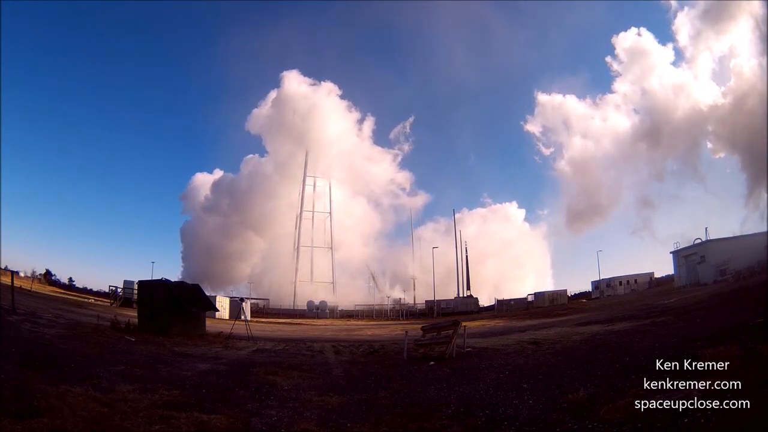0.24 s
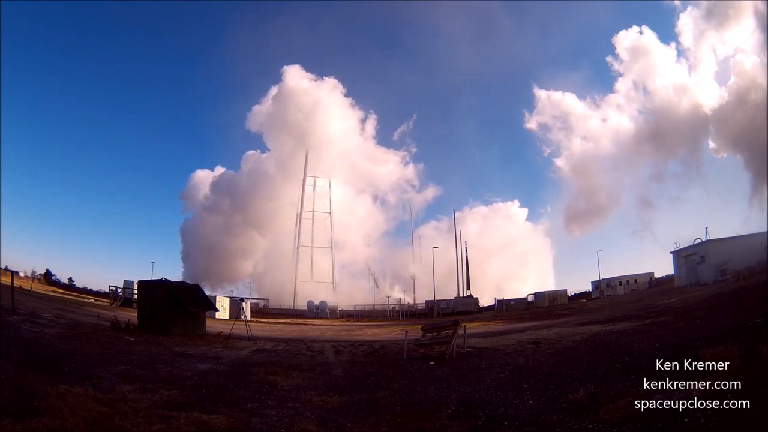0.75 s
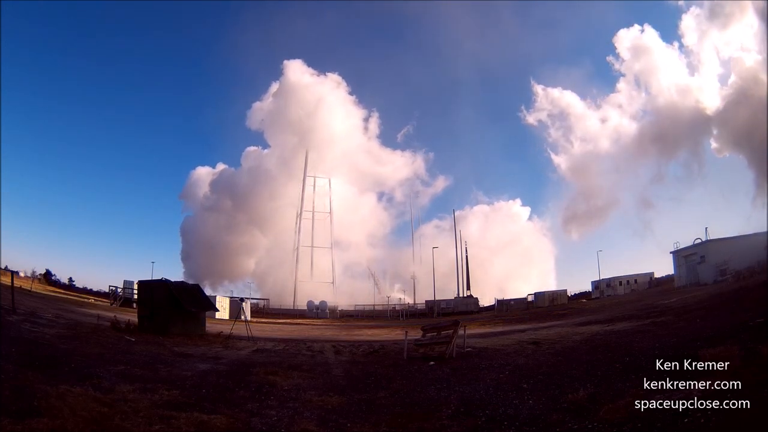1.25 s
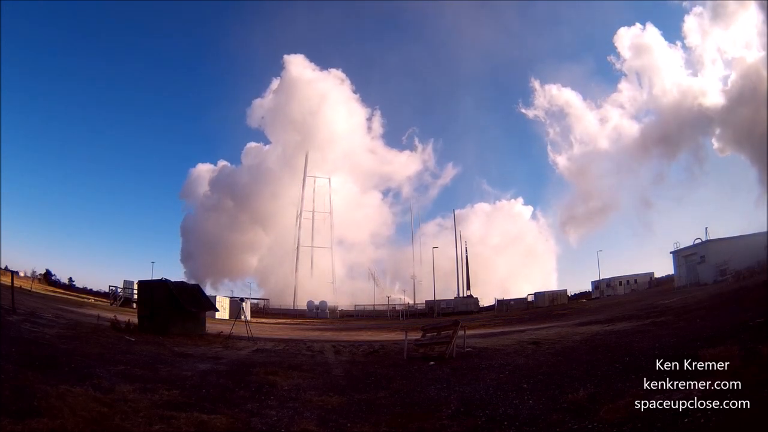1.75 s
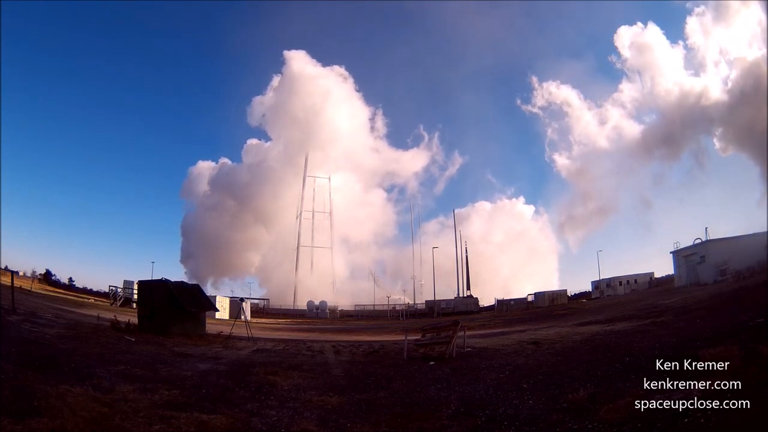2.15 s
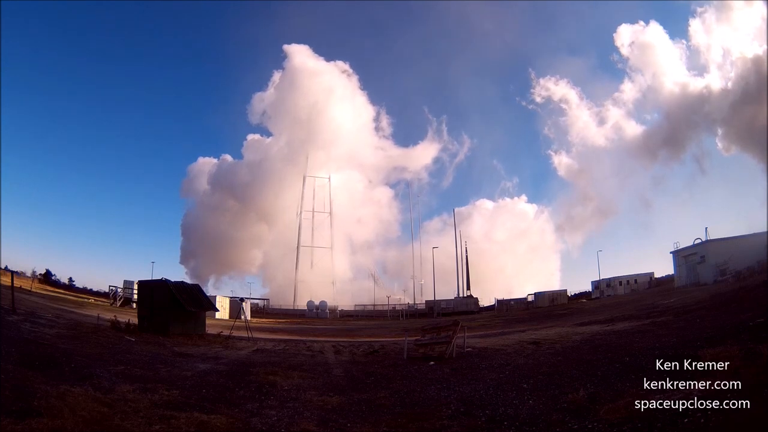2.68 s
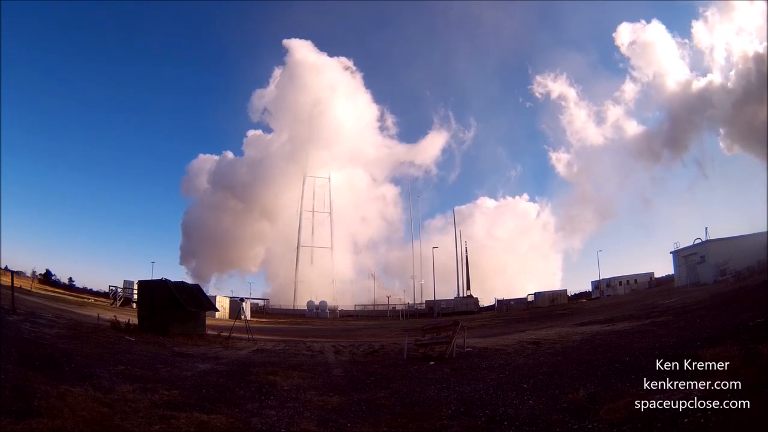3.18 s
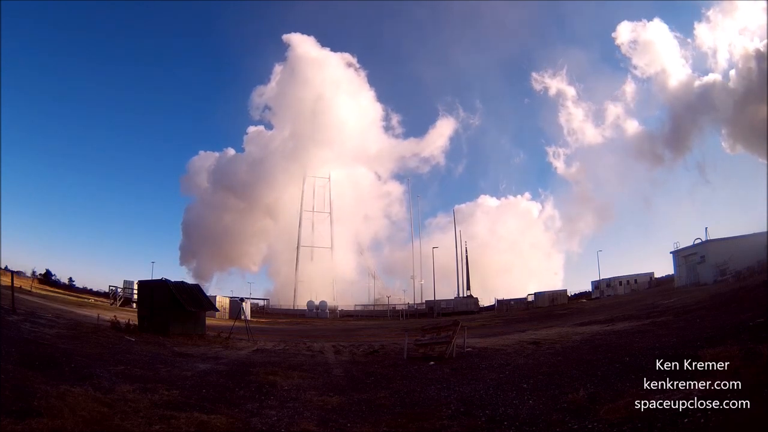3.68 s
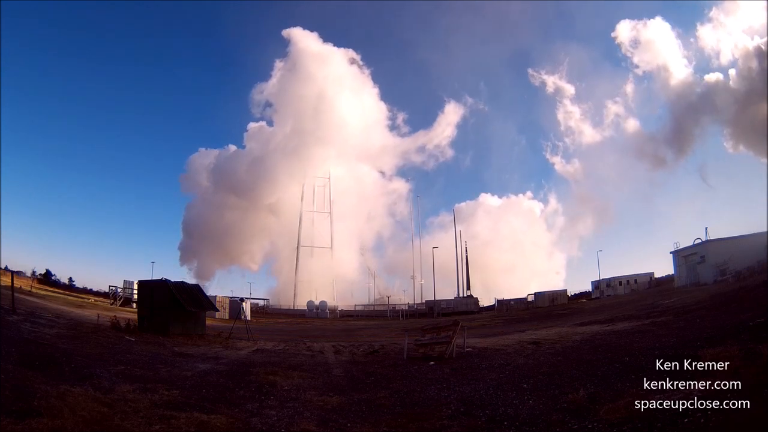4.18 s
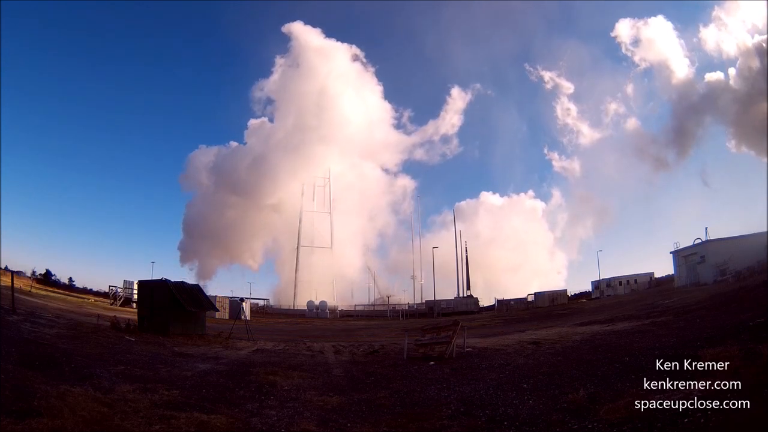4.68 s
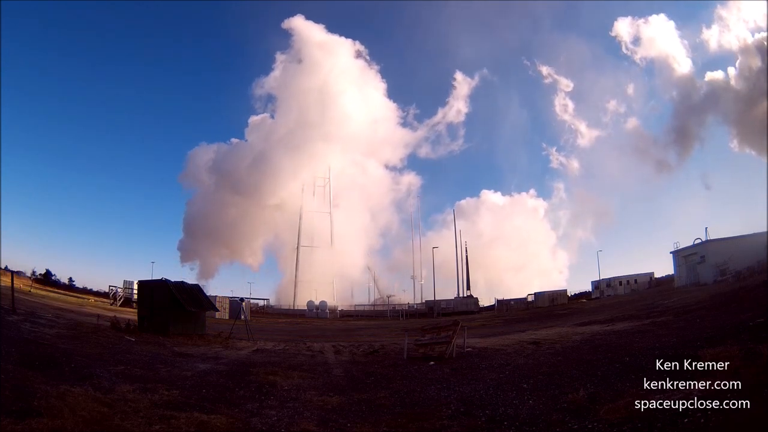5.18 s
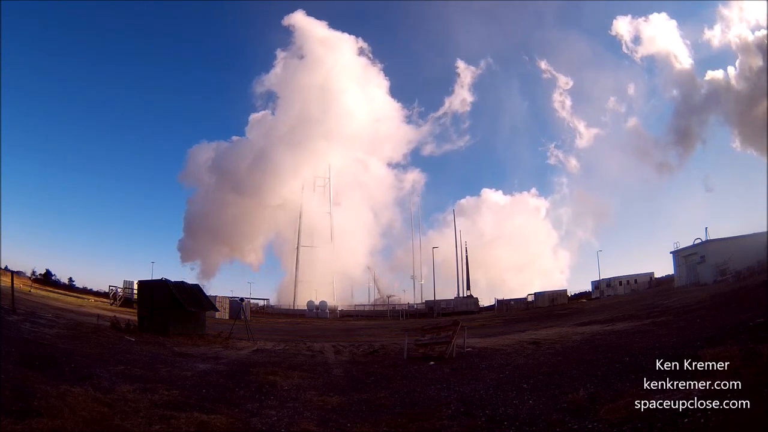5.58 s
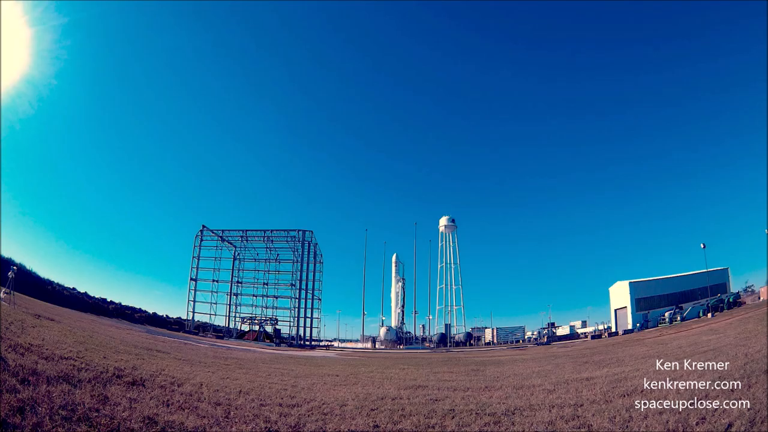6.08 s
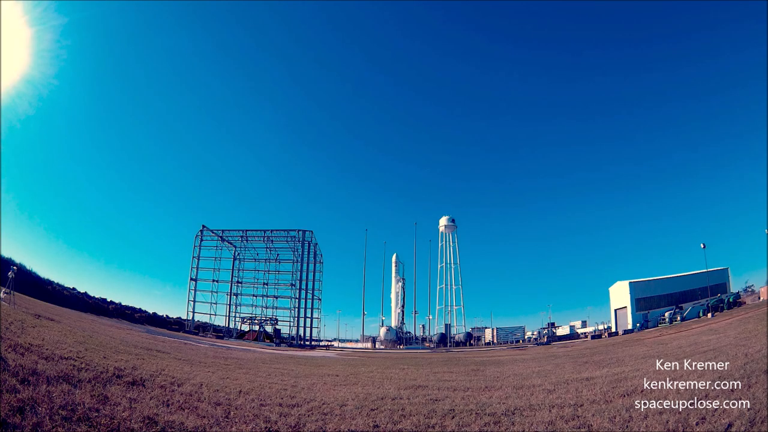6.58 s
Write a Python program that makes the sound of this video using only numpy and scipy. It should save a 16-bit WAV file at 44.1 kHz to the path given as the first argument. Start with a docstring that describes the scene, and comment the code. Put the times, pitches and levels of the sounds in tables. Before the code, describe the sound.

A rocket engine roars harshly and steadily close by, thudding low, then cuts off abruptly to a very quiet windy field with faint bird chirps.

```python
"""Rocket exhaust, then a quiet field

Rocket exhaust roars near a launch pad: turbulent noise, split into bands with their own level curves and coloured
by the resonances and notches of a small microphone housing. Windowed sines add low thuds and short mid-pitched
surges; the bass slowly fades. An edit cuts to a field through a similar housing: noise for soft wind, gliding
sines for a thin bird call. A faint buzz of ringing ticks, probably the recorder's own electronics, comes and goes."""
import sys
import numpy as np
from scipy import signal
from scipy.fft import rfft, irfft, next_fast_len
from scipy.io import wavfile
from scipy.ndimage import uniform_filter1d, map_coordinates

SR = 44100
rng = np.random.default_rng(int(sys.argv[2]) if len(sys.argv) > 2 else 0)


def waveform_to_disk(signal):
    """Save audio, clipped to [-1, 1], as 16-bit WAV at the path in sys.argv[1]."""
    frames = np.transpose(np.atleast_2d(signal))
    scaled = np.clip(frames, -1, 1) * 32767
    samples = np.round(scaled).astype(np.int16)
    wavfile.write(sys.argv[1], SR, samples)


N = 301541


def amp(db):
    """Decibel law: 20 dB is a factor of ten in amplitude."""
    return 10 ** (np.asarray(db) / 20)


def unit(x):
    """Normalization to an rms of 1."""
    return x / np.sqrt(np.mean(x ** 2) + 1e-20)


def curve(rows):
    """Linear interpolation of (t/s, value) rows to one value per sample."""
    s, values = np.transpose(rows)
    return np.interp(np.arange(N) / SR, s, values)


def bumps(rows):
    """Superposition of Gaussian bells from rows of (t/s, height, half width at 1/e in s)."""
    t = np.arange(N) / SR
    return sum(height * np.exp(-((t - s) / width) ** 2) for s, height, width in rows)


def wobble(rate):
    """Band-limited random modulation: a smooth curve through random knots, rate knots a second."""
    knots = rng.standard_normal(int(N * rate / SR) + 4)
    return map_coordinates(knots, [np.arange(N) * rate / SR])


def filtered(x, response):
    """Linear filtering: the spectrum of x times a complex response of frequency."""
    m = next_fast_len(N + SR // 2)
    spectrum = rfft(x, m) * response(np.fft.rfftfreq(m, 1 / SR))
    return irfft(spectrum, m)[..., :N]


def housed(x, tilt, housing):
    """Cavity coloration: a broad tilt, then a pole-zero pair per resonance (dB > 0) or notch (dB < 0)."""
    def response(f):
        hz, db = np.transpose(tilt)
        gain = amp(np.interp(np.log(f + 1), np.log(hz + 1), db)) + 0j
        for c, w, peak_db in housing:
            g = amp(peak_db / 2)
            zero = c * c - f * f + 1j * f * w * g
            pole = c * c - f * f + 1j * f * w / g
            gain = gain * zero / pole
        return gain
    return filtered(x, response)


def bands(x, edges_hz):
    """Crossover filtering: x split by steep slopes into parts of rms 1, low to high."""
    lows = [filtered(x, lambda f: 1 / (1 + (f / edge) ** 12)) for edge in edges_hz]
    return [unit(high - low) for low, high in zip([0] + lows, lows + [x])]


def steady(x, span_s):
    """Envelope flattening: division by the running rms evens out slow swells."""
    span = int(span_s * SR)
    power = uniform_filter1d(uniform_filter1d(x ** 2, span), span)
    return x / np.sqrt(abs(power) + 1e-9)


def breathy(hz, width_hz):
    """Narrow-band noise of rms 1: a bell-shaped filter, at half amplitude width_hz either side of hz."""
    return unit(filtered(rng.standard_normal(N), lambda f: 1 / (1 + ((f - hz) / width_hz) ** 2)))


def turbulence(patchy_db):
    """Intermittency: white noise with drifting time-frequency patches of gain, as eddies come and go."""
    z = signal.stft(rng.standard_normal(N), nperseg=512)[2]
    patches = uniform_filter1d(uniform_filter1d(rng.standard_normal(z.shape), 8, 0), 10, 1)
    return signal.istft(z * amp(patchy_db * unit(patches)), nperseg=512)[1][:N]


def buzz(bursts, colour):
    """Impulse response of treble resonances: regular ticks, usually after a weaker forerunner, ring briefly."""
    tick_hz = 164.4
    swell_db, swell_s = -2, .03  # a burst starts this soft and fills in over this time
    # Accent pattern of the ticks, which come in threes: level/dB
    tick_steps = [0, -10, -2]
    ticks = np.zeros(N)
    for s, length, db in bursts:
        k = np.arange(int(length * tick_hz) + 1)
        size_db, lead_db, lead_s = rng.standard_normal((len(k), 3)).T
        at = np.round((s + k / tick_hz) * SR).astype(int)
        onset_db = swell_db * np.exp(-k / tick_hz / swell_s)
        size = amp(db + np.take(tick_steps, k % 3) + 1.2 * size_db + onset_db)
        lead = np.round((.0016 + .0002 * lead_s) * SR).astype(int)
        ticks[at] = size
        ticks[at - lead] = size * amp(-6 + 3 * lead_db)

    def ring(f):
        return sum(amp(db) * (1j * f * w / (c * c - f * f + 1j * f * w)) ** 3 for c, w, db in colour)

    one_tick = filtered(signal.unit_impulse(N), ring)
    return filtered(ticks, ring) / abs(one_tick).max()


def field():
    """Flow noise: wind thumps on the housing over a distant rush, a faint hum and uneven microphone hiss."""
    wind_db, rush_db, gust_s = -49, -56.5, 0.021  # between gusts; distant rush; half width of a gust
    # Spectral tilt of the field noise: f/Hz, relative level/dB
    field_tilt = [(8, -14), (20, -10), (34, -2.5), (80, -7), (150, -2), (600, -33.5), (2000, -46.5),
                  (5500, -46), (8500, -42), (10600, -42), (12000, -44), (15000, -45), (15700, -39.5)]
    # Resonances and notches of the field housing: f/Hz, width/Hz, level/dB
    field_housing = [(118, 115, 1.5), (184, 45, -13), (243, 30, 12), (316, 76, -10), (420, 72, 15),
                     (1000, 300, 12), (1117, 38, 14), (1470, 370, 13.5), (1680, 140, 24), (1970, 80, 11),
                     (2260, 149, 12), (2680, 470, 18), (3200, 110, 10), (3797, 636, 6), (4878, 640, 8)]
    # Gusts and sudden lulls: t/s, level over the wind between gusts/dB
    gusts = [(5.985, 7), (6.045, 4), (6.216, 10), (6.258, -2), (6.325, 3), (6.41, 4), (6.53, 3), (6.63, 4),
             (6.678, -2), (6.71, 6.5), (6.83, 5)]
    thump_db = wind_db + bumps([(s, db, gust_s) for s, db in gusts])
    thump, rush, hiss = bands(housed(turbulence(patchy_db=1.5), field_tilt, field_housing), [200, 3000])
    hum = amp(-62.5) * steady(breathy(hz=242, width_hz=1.5), span_s=0.17)
    hum += amp(-71) * steady(breathy(hz=415, width_hz=3), span_s=0.13)
    hum += amp(-83) * breathy(hz=670, width_hz=3)
    wind = amp(thump_db) * steady(thump, span_s=0.11)
    hiss_db = -65.5 + 0.7 * wobble(12)
    return wind + amp(rush_db) * rush + amp(hiss_db) * hiss + hum


def bird():
    """Frequency modulation: unsteady gliding sines, blurred by scattered echoes off ground and sheds."""
    # Whistled notes: t/s, length/s, start f/Hz, end f/Hz, mid-note sag/Hz (negative rises), rms level at crest/dB
    notes = [(5.987, .15, 7770, 7900, 0, -73), (6.445, .115, 7560, 7750, 200, -74),
             (6.566, .036, 7600, 7300, 600, -67), (6.598, .034, 7100, 7100, 1000, -73),
             (6.62, .018, 7140, 7140, 0, -75), (6.653, .022, 6940, 7040, 250, -70),
             (6.65, .022, 6900, 7000, -300, -73), (6.408, .012, 10500, 10900, 0, -69),
             (6.47, .014, 10300, 10100, 0, -75), (6.606, .012, 9800, 10100, 0, -77),
             (6.672, .014, 10300, 11000, 0, -78), (6.708, .014, 10300, 10800, 0, -76),
             (6.738, .012, 10600, 10000, 0, -76), (6.757, .03, 10550, 10600, 0, -79),
             (6.81, .012, 10500, 10700, 0, -78)]
    note_swell = .6  # power of the sine arch that shapes a note
    t, song = np.arange(N) / SR, np.zeros(N)
    for s, length, start_hz, end_hz, sag_hz, db in notes:
        u = np.clip((t - s) / length, 0, 1)
        arch = abs(np.sin(np.pi * u))
        hz = start_hz + (end_hz - start_hz) * u - sag_hz * arch
        level = np.sqrt(2) * amp(db + 1.5 * wobble(120))
        song += arch ** note_swell * level * np.sin(2 * np.pi * np.cumsum(hz) / SR)
    # echoes fall by 60 dB in 0.12 s
    echoes = rng.standard_normal(SR // 5) * amp(-60 * t[:SR // 5] / .12)
    return song + amp(-14) * signal.fftconvolve(song, echoes / np.linalg.norm(echoes))[:N]


def pulses(rows):
    """Wave packets: each pulse is a sine of random phase under a Gaussian envelope a few cycles long."""
    cycles_at_200_hz, cycles_grow = 1.19, 0.3  # half width; power by which higher pulses hold more cycles
    out = np.zeros(N + SR)
    t = np.arange(-SR // 8, SR // 8) / SR
    for (s, db, hz), turn in zip(rows, rng.random(len(rows))):
        width = cycles_at_200_hz * (hz / 200) ** cycles_grow / hz
        packet = np.exp(-(t / width) ** 2) * np.sin(2 * np.pi * (hz * t + turn))
        out[round(s * SR):][:len(t)] += amp(db) * packet
    return out[len(t) // 2:][:N]


def jet_levels():
    """Band energy envelopes: level in dB of each band, low to high; the lowest fade as the rocket climbs."""
    # Deepest rumble: t/s, level/dB
    rumble = [(0, -30), (.5, -26), (1.2, -28), (2.0, -30), (2.8, -30), (3.1, -28.5), (3.7, -26.5),
              (4.3, -30.5), (4.7, -30.5), (5.3, -30.5), (5.95, -32.5)]
    # Thud band: t/s, level/dB
    thud = [(0, -31), (.7, -29.5), (1.3, -31), (2.0, -30.5), (2.6, -34), (3.5, -36.5), (4.5, -35),
            (5.3, -35.5), (5.95, -37)]
    # Body near 270 Hz: t/s, level/dB
    bass = [(0, -31.5), (1.2, -32), (1.8, -32), (2.1, -33.5), (2.6, -28.5), (3.3, -30), (4.3, -30.5),
            (5.0, -32.5), (5.95, -33)]
    # Hollow band near 470 Hz: t/s, level/dB
    hollow = [(0, -38.5), (.5, -36), (1.4, -31.5), (1.8, -38.5), (2.6, -35), (3.4, -36.5), (4.3, -37.5),
              (5.2, -37.5), (5.95, -35.5)]
    # Growl band: t/s, level/dB
    growl = [(0, -30.5), (.4, -29.5), (.9, -33), (1.3, -32.5), (1.6, -29), (2.15, -30), (2.5, -35.5),
             (3.0, -32), (3.7, -29.5), (4.1, -32.5), (5.95, -31)]
    # Roar band: t/s, level/dB
    roar_level = [(0, -26), (.7, -26), (1.15, -27.5), (1.6, -25.5), (2.1, -24), (2.5, -25), (4.7, -25.5),
                  (5.95, -28.5)]
    # Brief flares of the roar band: t/s, rise/dB, half width/s
    flares = [(.75, 4, 0.058), (1.635, 10, 0.0082), (2.0, 2.5, 0.03), (2.11, 3.5, 0.055), (4.07, 2, 0.025),
              (4.43, 5, 0.013), (4.61, 0.5, 0.022), (4.77, 3.5, 0.022)]
    # Hiss band: t/s, level/dB
    jet_hiss = [(0, -33), (.3, -32), (1.2, -33.5), (2.2, -32), (2.7, -32.5), (3.3, -30.5), (4.6, -32),
                (4.75, -32), (5.95, -33.5)]
    # Treble: t/s, level/dB
    fizz = [(0, -41.5), (1.2, -42), (2.55, -42), (2.9, -38.5), (4.0, -39), (4.3, -40), (5.95, -40)]
    return [curve(rumble), curve(thud), curve(bass), curve(hollow), curve(growl),
            curve(roar_level) + bumps(flares), curve(jet_hiss), curve(fizz)]


def exhaust():
    """Turbulent jet noise: most bands swell on their own, a shared flutter moves the upper ones."""
    # Crossovers between the bands: f/Hz
    split_hz = [100, 215, 345, 600, 1240, 2200, 5500]
    # Lowest part of the jet's spectral tilt: f/Hz, relative level/dB
    sub_tilt = [(5, -16), (11, -3), (16, -2.5), (26, 1.5)]
    # Low and middle part of the tilt: f/Hz, relative level/dB
    jet_tilt = [(40, 5.5), (60, 5.5), (200, -1.5)]
    # Upper part of the tilt: f/Hz, relative level/dB
    high_tilt = [(1000, -23), (3000, -29), (7500, -38.6), (9000, -41.4), (11600, -46.6), (11900, -54.4),
                 (15000, -59), (15700, -67)]
    # Low resonances and notches of the pad housing: f/Hz, width/Hz, level/dB
    pad_housing = [(104, 136, -13.5), (278, 35, 5.5), (371, 47, -7.5), (472, 68, 9), (599, 210, -23),
                   (864, 150, 3)]
    # Upper resonances and notches of the pad housing: f/Hz, width/Hz, level/dB
    high_housing = [(1127, 238, 12.6), (1241, 109, -13.5), (1680, 1482, 30.0), (1797, 134, 5.0),
                    (1891, 146, -14.4), (2035, 92, 3.4), (2222, 147, -16.7), (2900, 486, 6.6),
                    (3520, 156, 3.5), (3740, 192, -8.7), (3975, 178, -14.2), (4099, 116, -11.9),
                    (4823, 1010, 25.0), (4940, 213, -21.3), (5109, 190, 4.0), (5505, 89, -11.8),
                    (5873, 170, 2.8), (6160, 76, -2.1), (7266, 163, 4.8), (7374, 2181, 11.3),
                    (8275, 44, -2.6), (8693, 49, -3.6), (8969, 191, -6.8), (9350, 112, -2.6),
                    (9812, 199, 5.6), (10378, 180, -5.4), (10644, 56, -2.8)]
    # Breathy tone that rises late in the roar: t/s, level/dB
    hoot = [(4.3, -62), (4.9, -46), (5.3, -44), (5.95, -36)]
    jet = turbulence(patchy_db=1.0)
    coloured = housed(jet, sub_tilt + jet_tilt + high_tilt, pad_housing + high_housing)
    parts = bands(coloured, split_hz)
    flutter = 0.45 * wobble(45)
    swells_db = [0.33 * wobble(14),
                 1.3 * wobble(12),
                 0.5 * wobble(15) + 0.29 * flutter,
                 0.33 * wobble(11) + 0.3 * flutter,
                 0.53 * flutter + 0.14 * wobble(11),
                 0.34 * flutter,
                 1.1 * flutter + 0.4 * wobble(15),
                 1.1 * flutter + 0.4 * wobble(10)]
    roar = sum(amp(db + swell) * steady(part, span_s=0.19)
               for db, swell, part in zip(jet_levels(), swells_db, parts))
    return roar + amp(curve(hoot)) * breathy(hz=889.4, width_hz=10.4)


def scene():
    """Superposition: pad sources until the cut, field sources after it; one microphone feeds both channels."""
    cut_s = 5.9625
    buzz_start_s, buzz_every_s, buzz_s = .328, 1.0, .25
    buzz_db, buzz_grows_db = -63, .6  # nominal tick peak of the first burst at the pad; rise per burst
    # Low pressure pulses in the exhaust: t/s, envelope peak level/dB, f/Hz
    thuds = [(0.011, -19, 40), (0.018, -15.5, 238), (0.104, -20, 48), (0.146, -17, 209), (0.254, -13, 233),
             (0.287, -17.5, 41), (0.288, -11, 203), (0.407, -13.5, 246), (0.408, -29, 32),
             (0.518, -17, 234), (0.65, -20, 230), (0.7, -22, 25), (0.73, -19, 180), (0.821, -15.5, 205),
             (0.866, -18, 250), (0.922, -18, 232), (0.977, -23, 34), (0.98, -13, 233), (1.017, -12.5, 230),
             (1.07, -31, 190), (1.12, -15.5, 197), (1.161, -18, 40), (1.161, -22, 224), (1.227, -16.5, 210),
             (1.18, -21, 40), (1.284, -14, 250), (1.308, -15, 200), (1.355, -27, 226), (1.433, -16, 231),
             (1.519, -16, 53), (1.564, -15, 201), (1.644, -14, 223), (1.701, -19, 37), (1.729, -14, 220),
             (1.78, -25, 231), (1.82, -18.5, 234), (1.845, -13, 220), (1.938, -23.2, 31), (2.143, -21, 39),
             (2.158, -20, 256), (2.295, -29, 38), (2.347, -18, 237), (2.397, -13.5, 245), (2.576, -30, 31),
             (2.712, -30, 36), (2.849, -18, 263), (3.031, -20, 26), (3.181, -17, 253), (3.183, -20, 34),
             (3.769, -26, 46), (3.769, -26, 243), (4.284, -16, 43), (4.398, -20, 46), (4.756, -29, 38),
             (4.826, -17.5, 290), (5.058, -34, 45), (5.195, -23.3, 241), (5.312, -25, 43),
             (5.318, -21, 262), (5.452, -25, 230), (5.624, -22, 39), (5.665, -28, 228), (5.835, -24, 227),
             (5.869, -34, 259), (5.898, -28, 35), (5.932, -44, 264)]
    # Short mid-pitched surges in the roar: t/s, envelope peak level/dB, f/Hz
    surges = [(0.007, -30, 1415), (0.069, -20, 1600), (0.094, -15, 1540), (0.123, -19, 1518),
              (0.202, -22, 1440), (0.24, -20, 1500), (0.394, -22, 1398), (0.729, -15, 1651),
              (0.765, -17, 1550), (1.162, -16.5, 1500), (1.638, -11, 1575), (1.947, -12, 1440),
              (1.984, -12, 1578), (2.104, -11, 1460), (2.402, -14, 1596), (2.47, -9, 1630),
              (2.778, -11, 1620), (4.051, -16, 1600), (4.315, -15, 1515), (4.422, -20, 1550),
              (4.528, -15, 1430), (4.612, -16, 1550), (4.76, -31, 1640), (5.428, -20, 1516),
              (5.607, -22, 1396), (5.705, -17, 1460), (5.832, -21, 1540), (5.87, -19.1, 1567),
              (5.931, -29, 1560)]
    # Tick resonance at the pad: f/Hz, width of each of three stages/Hz, level/dB
    pad_tick = [(14600, 1600, 0)]
    # Tick resonances in the field: f/Hz, width of each of three stages/Hz, level/dB
    field_tick = [(7130, 1100, -4), (9190, 700, 3), (9900, 900, 2), (10800, 1000, 1)]
    # Buzz bursts in the field: t/s, length/s, nominal tick peak level/dB
    field_buzz = [(6.0585, .022, -49), (6.1283, .202, -51.5)]
    after = np.clip((np.arange(N) / SR - cut_s) / .001, 0, 1)  # 1 ms crossfade
    bursts = [(buzz_start_s + k * buzz_every_s, buzz_s, buzz_db + k * buzz_grows_db)
              for k in range(int(cut_s) + 1)]
    pad = exhaust() + pulses(thuds + surges) + buzz(bursts, pad_tick)
    quiet = field() + bird() + buzz(field_buzz, field_tick)
    return np.tile((1 - after) * pad + after * quiet, (2, 1))


def record(dry):
    """Band limitation: nothing is kept from 15750 Hz up."""
    return filtered(dry, lambda hz: hz < 15750)


dry = scene()
out = record(dry)
waveform_to_disk(out)
```